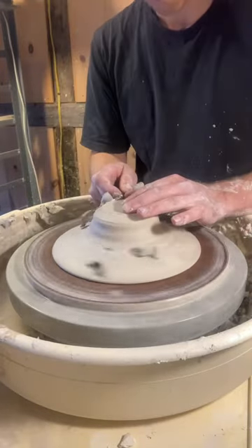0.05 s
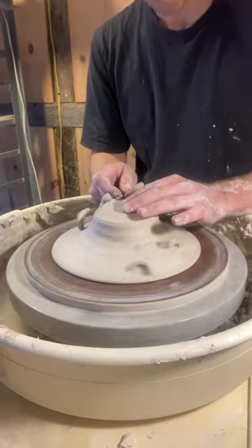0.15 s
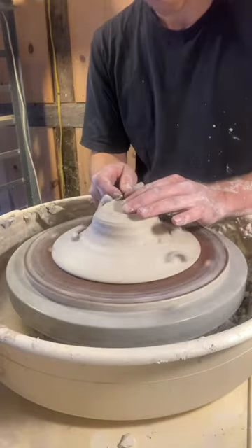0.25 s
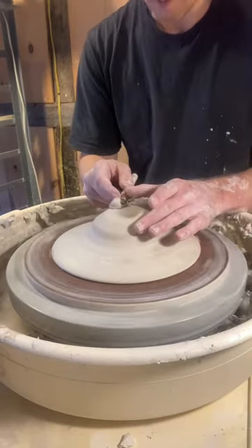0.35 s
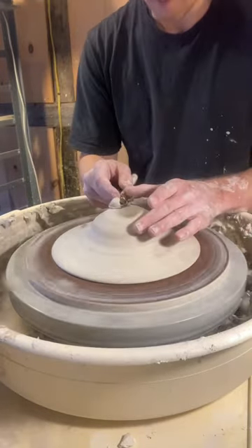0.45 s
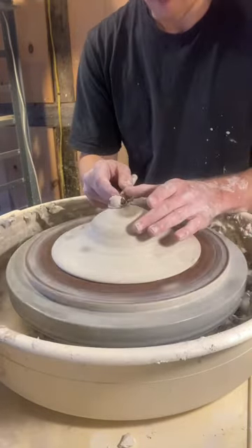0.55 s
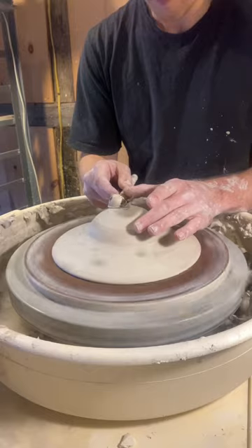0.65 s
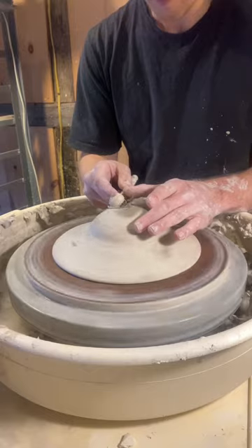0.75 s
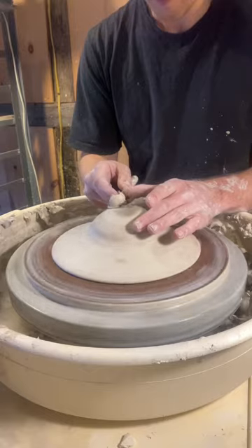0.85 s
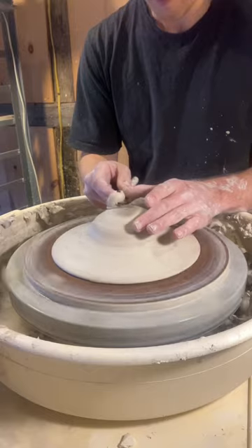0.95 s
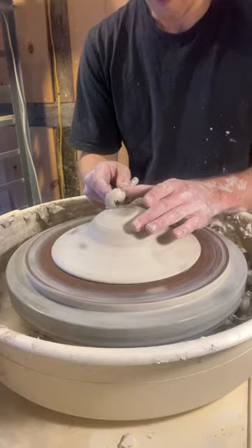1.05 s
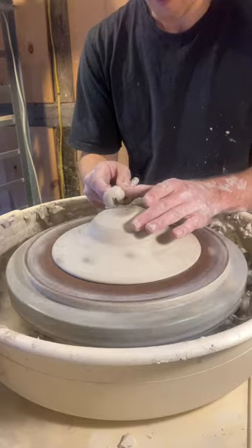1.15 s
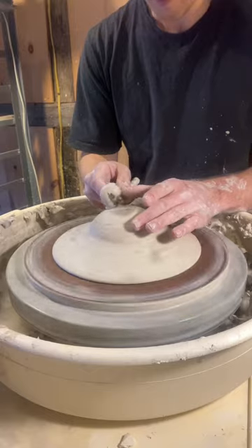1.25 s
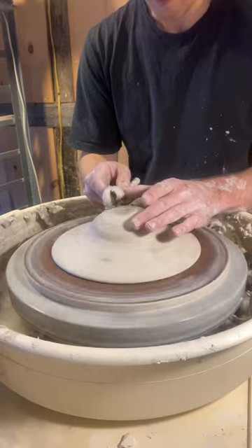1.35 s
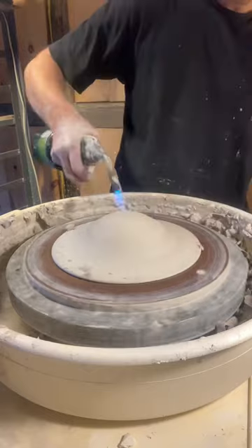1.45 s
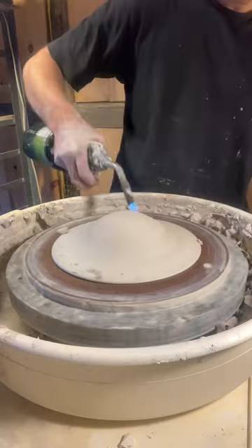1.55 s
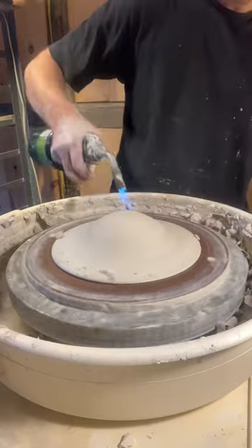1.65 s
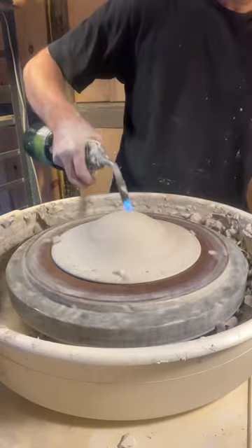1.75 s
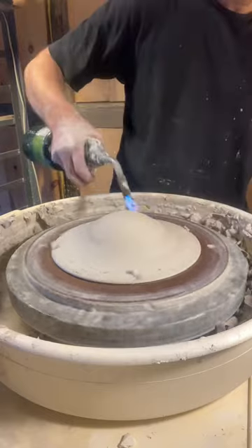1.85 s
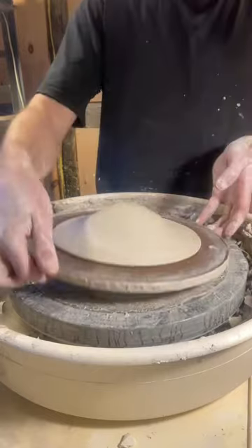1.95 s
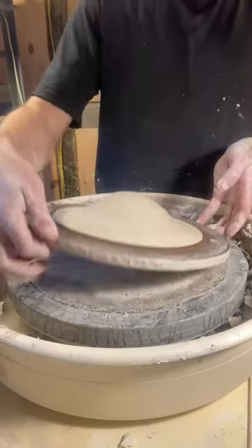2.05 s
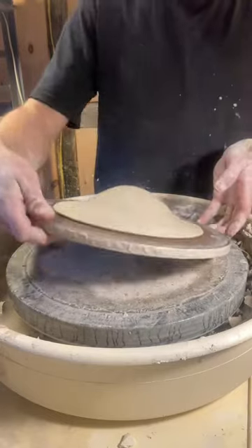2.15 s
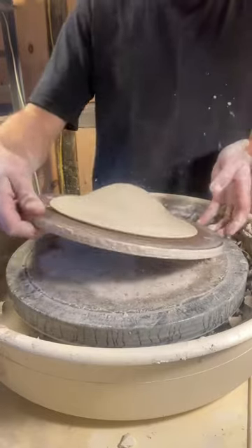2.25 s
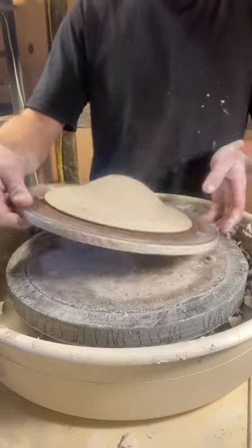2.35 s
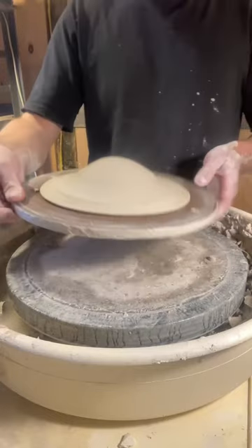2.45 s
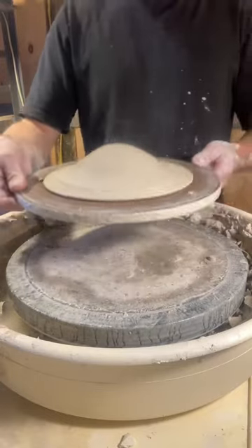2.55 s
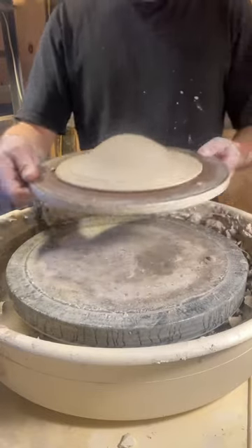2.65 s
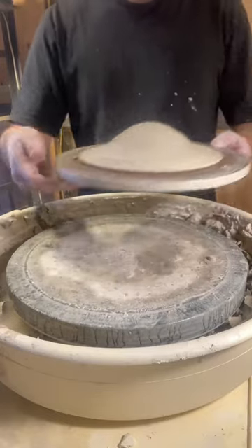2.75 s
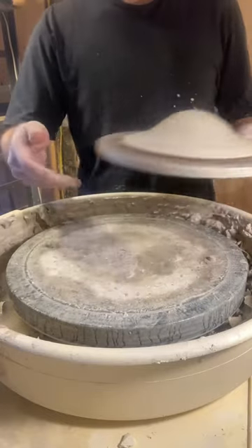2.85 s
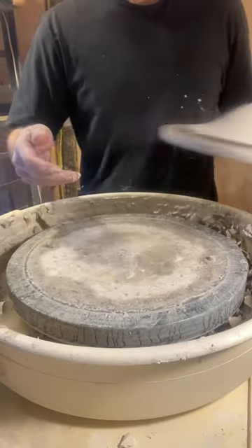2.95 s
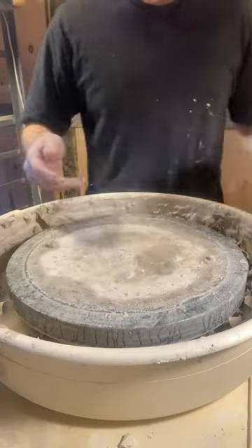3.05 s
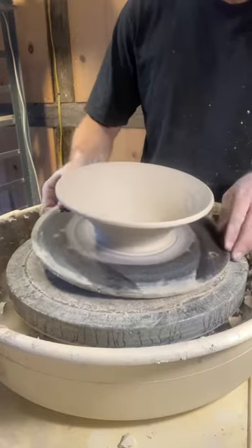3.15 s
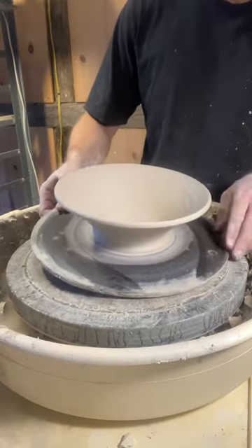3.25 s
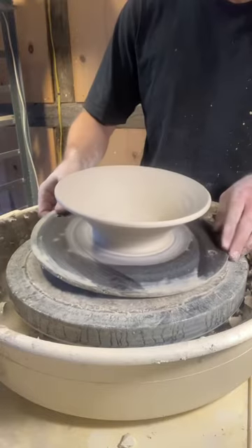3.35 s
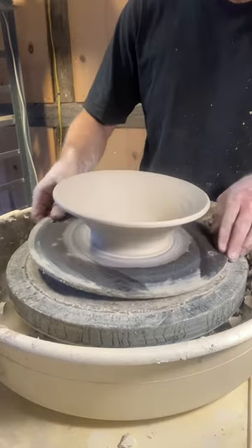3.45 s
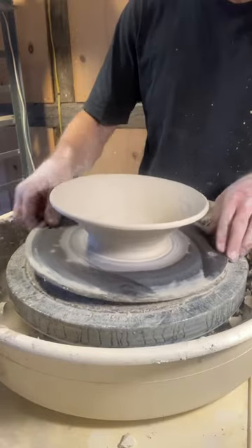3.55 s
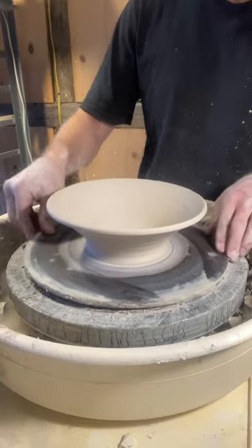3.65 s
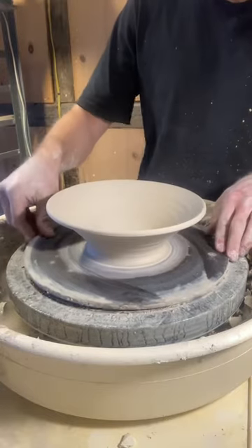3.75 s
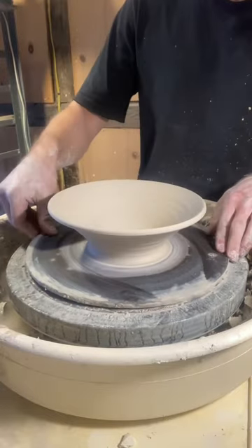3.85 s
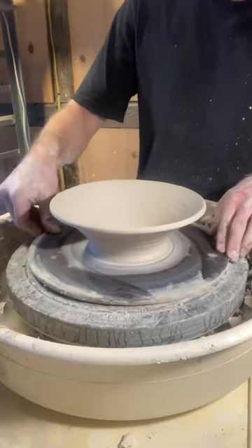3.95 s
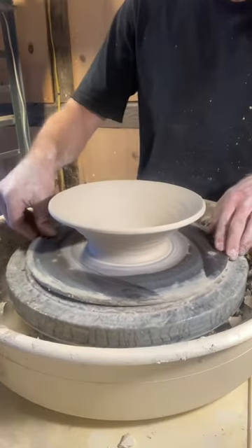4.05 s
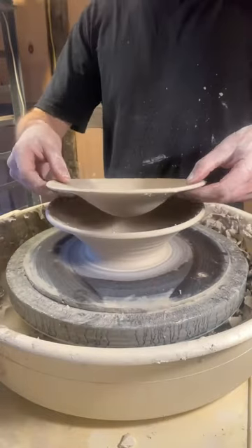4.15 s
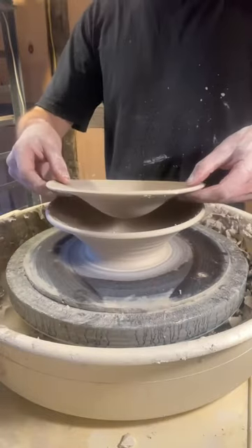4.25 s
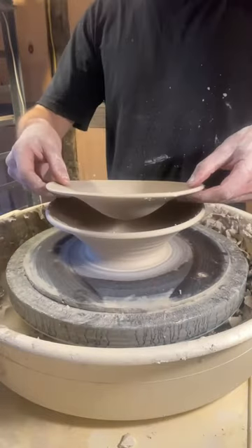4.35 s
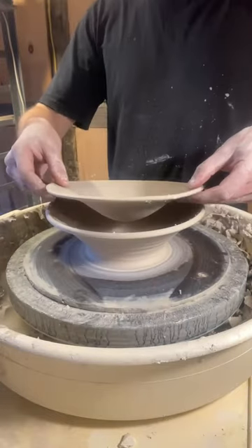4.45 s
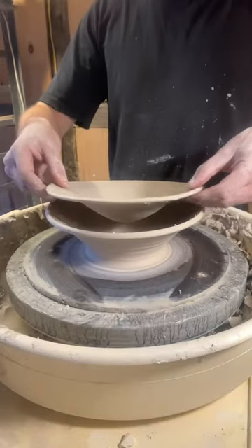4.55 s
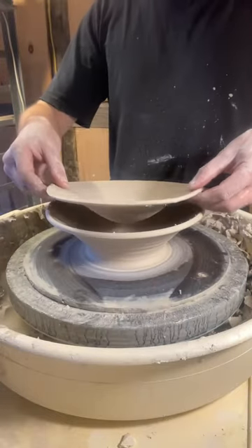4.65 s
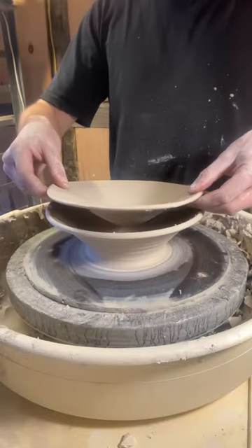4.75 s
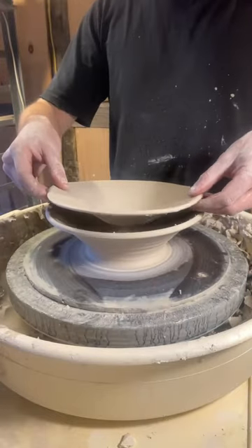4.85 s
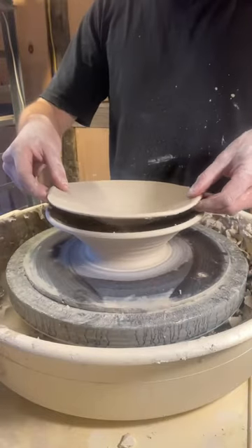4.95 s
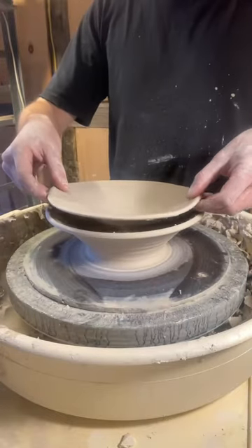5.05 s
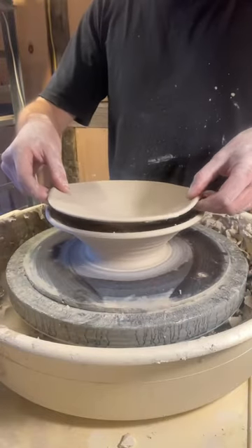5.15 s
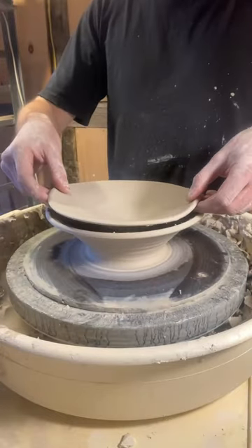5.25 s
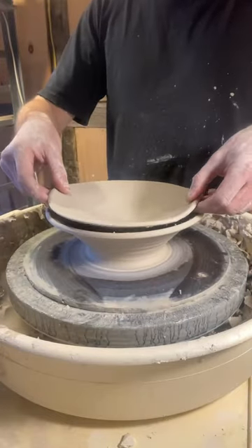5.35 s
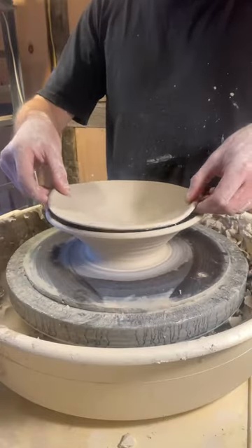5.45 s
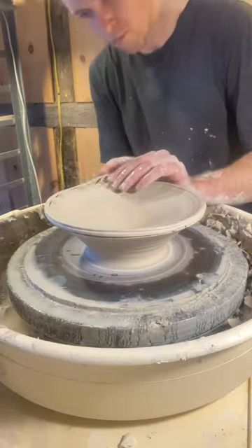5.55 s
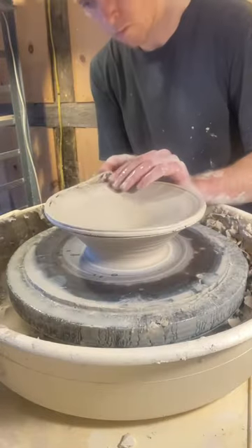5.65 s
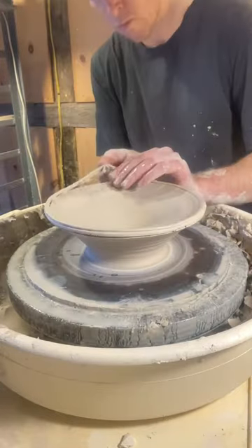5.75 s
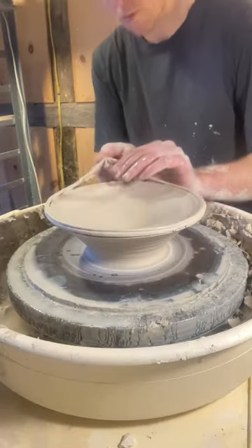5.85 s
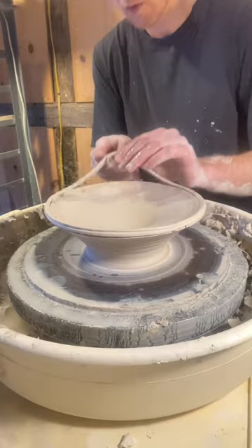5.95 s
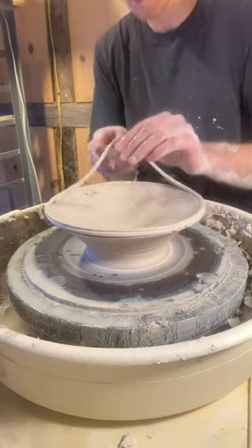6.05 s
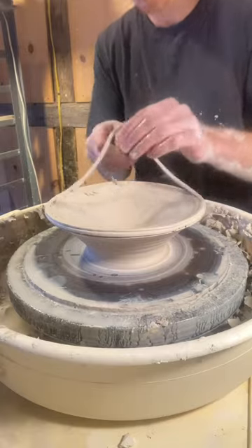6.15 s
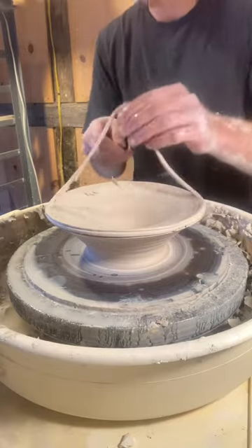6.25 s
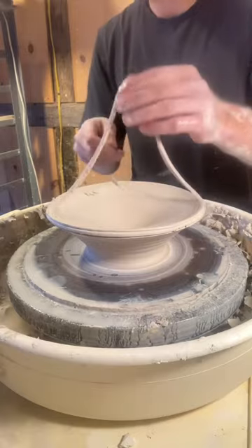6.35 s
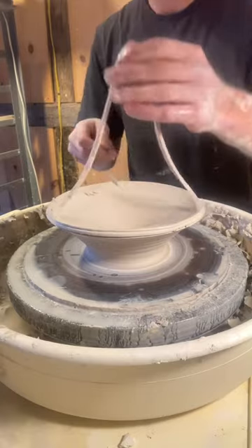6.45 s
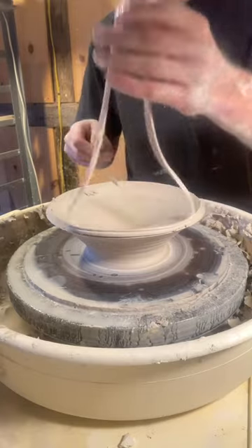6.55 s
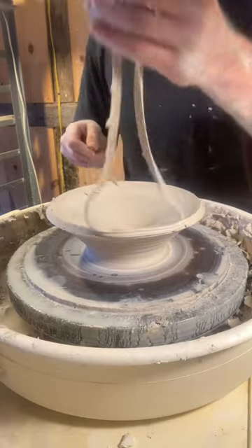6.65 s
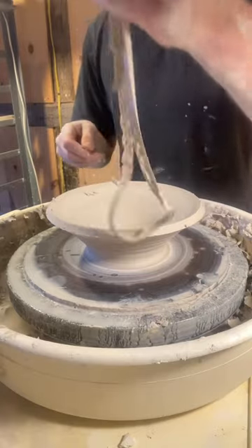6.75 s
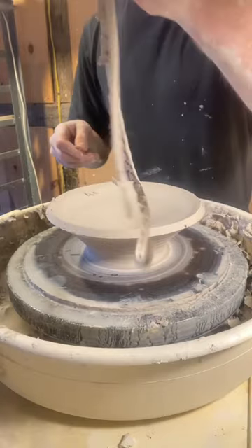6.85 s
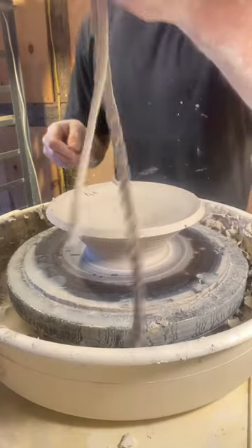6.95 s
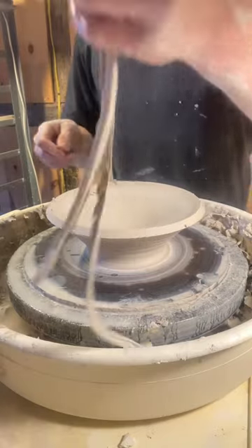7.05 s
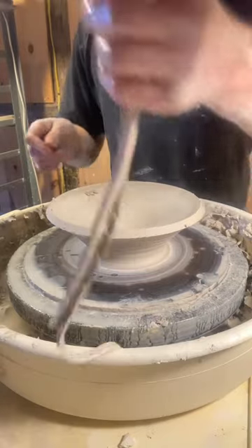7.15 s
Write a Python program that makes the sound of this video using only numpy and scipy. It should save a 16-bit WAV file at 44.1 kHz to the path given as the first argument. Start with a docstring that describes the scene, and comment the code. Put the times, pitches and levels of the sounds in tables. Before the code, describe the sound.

Close stereo sound of a potter at work in brief joined scenes: a deep mains hum and wheel drone under soft scraping, then a fluttering gas flame, roaring and stopping abruptly. Wooden-sounding knocks follow, then gritty sliding, hard clicks and thuds as a board is seated. A quiet stretch of hum and hiss leads to one harsh, growing scratch on a hollow dish, then almost nothing.

```python
"""A potter's wheel hums and drones in a small studio, in short scenes with a brief dip in level between them.
A tool shaves spinning clay, a gas torch roars, a bat (the loose board on the wheel) is knocked and pushed
over the gritty wheel head until it clicks home, and a needle rasps round the rim of a dish.
Hum and shaft drone are sine waves; torch, rumble and hiss are filtered noise; tool, grit and needle are
showers of tiny random slips; knocks and clicks are short pushes that make resonances ring."""
import sys
import numpy as np
from scipy import signal
from scipy.fft import rfft, irfft, next_fast_len
from scipy.io import wavfile
from scipy.ndimage import map_coordinates

SR = 44100
rng = np.random.default_rng(int(sys.argv[2]) if len(sys.argv) > 2 else 0)


def dump_mix(stems):
    """Bounce the given channels to the path in sys.argv[1] as a 16-bit WAV at rate SR."""
    frames = np.atleast_2d(stems).T  # one column per channel
    limited = np.clip(frames, -1, 1)  # hard clip at full scale
    pcm = np.round(limited * 32767).astype(np.int16)
    wavfile.write(sys.argv[1], SR, pcm)


N = 317079
T = np.arange(N) / SR  # time in s
FFT_SIZE = next_fast_len(N, real=True)
F = np.maximum(np.arange(FFT_SIZE // 2 + 1) * SR / FFT_SIZE, 1)  # frequency in Hz
MAINS_HZ = 60.02

# scenes and their steady background:
# start t/s, belt and bearing rumble/dB, hiss/dB, hiss band near 4 kHz/dB
SCENES = [(0, -54, -70, -88), (0.316, -54.5, -70, -80.5), (1.474, -58.5, -63.5, -79.5),
          (1.991, -64, -72, -79), (3.115, -63.5, -70.5, -75.5), (4.185, -67.5, -70, -83.5),
          (5.519, -63.5, -72, -82.5)]


def undb(db):
    """Decibels to gain."""
    return np.exp(np.asarray(db) * (np.log(10) / 20))


def unit(x):
    """Scale to rms 1."""
    return x / np.sqrt(np.mean(x ** 2))


def across(rows, axis=1):
    """A table column spread over log frequency."""
    hz, value = np.transpose(rows)[[0, axis]]
    return np.interp(np.log(F), np.log(hz), value)


def curve(rows, axis=1):
    """A table column spread over time."""
    return np.interp(T, *np.transpose(rows)[[0, axis]])


def by_scene(axis):
    """Gain that holds through each scene, from a dB column."""
    starts, db = np.transpose(SCENES)[[0, axis]]
    return undb(db[np.searchsorted(starts[1:], T)])


def stroke(start, length, db, growth_db, attack=0.015, release=0.074):
    """Gain that rises, holds around db while it grows by growth_db, then falls 60 dB per release time."""
    age = T - start
    held = db + growth_db * (np.clip(age / length, 0, 1) - .5)
    fall = 60 * np.clip((age - length) / release, 0, 3)
    return np.clip(age / attack, 0, 1) * undb(held - fall)


def noise():
    """White noise."""
    return rng.standard_normal(N)


def walk(rate):
    """Smooth random wander of rms 1; a higher rate (per s) wanders faster."""
    knots = np.arange(0, T[-1] + 1, 1 / (8 * rate))
    smooth = np.convolve(noise()[:len(knots) + 12], signal.windows.gaussian(13, 1.8), "valid")
    return unit(np.interp(T, knots, smooth))


def grains(rate, spread_db):
    """Tiny slips at random moments, about rate per s, of uneven size."""
    happens = rng.random(N) < rate / SR
    return unit(happens * noise() * undb(spread_db * np.clip(noise(), -2, 2)))


def colour(x, points, humps=()):
    """Filter by a smooth spectrum with bell-shaped humps and notches; steep fall below its first point."""
    db = across(points)
    for hz, width, hump_db in humps:
        db = db + hump_db * 2 ** -((2 * (F - hz) / width) ** 2)
    low_cut = np.minimum(F / points[0][0], 1) ** 4
    return irfft(rfft(x, FFT_SIZE) * undb(db) * low_cut, FFT_SIZE)[:N]


def ring(x, modes, polarity=1):
    """Pass through a bank of resonances; polarity -1 flips every other one, which fills the valleys."""
    out = 0
    for k, (hz, width, db) in enumerate(modes):
        out = out + polarity ** k * undb(db) * signal.lfilter(*signal.iirpeak(hz, hz / width, SR), x)
    return out


def whine(tones):
    """Noise held in narrow resonances; filtering twice gives steep skirts."""
    return unit(ring(ring(noise(), tones), tones))


def strike(blows, modes, order=2, polarity=1):
    """Each blow rings the modes; softer contact takes the treble away."""
    out = np.zeros(N + SR)
    for s, db, soft_hz in blows:
        contact = signal.butter(order, min(soft_hz, SR * 4 / 9), fs=SR)
        push = signal.lfilter(*contact, signal.unit_impulse(SR // 4) + 1e-18)
        hit = ring(push, modes, polarity)
        start = int(s * SR)
        out[start:start + len(hit)] += undb(db) * hit / np.abs(hit).max()
    return out[:N]


def scatter(x, t60):
    """Diffuse reflections of unit energy, dying by 60 dB in t60 seconds."""
    t = T[:SR // 2]
    tail = rng.standard_normal(len(t)) * undb(-60 * t / t60) * np.minimum(t / .003, 1)
    return signal.fftconvolve(x, tail / np.linalg.norm(tail))[:N]


def high_pass(x, hz):
    """Take the bass away."""
    return signal.sosfilt(signal.butter(2, hz, "high", fs=SR, output="sos"), x)


def split(x, edges_hz):
    """The bands between some frequencies, lowest first."""
    bands = []
    for hz in edges_hz:
        bands.append(signal.sosfiltfilt(signal.butter(4, hz, fs=SR, output="sos"), x))
        x = x - bands[-1]
    return bands + [x]


def glide(x, ratio):
    """Move all resonances of a steady noise by a changing pitch ratio."""
    return map_coordinates(x, [np.cumsum(ratio)], mode="mirror")


def stereo(mid, side):
    """Left and right from mid and side."""
    return np.array([mid + side, mid - side])


def hum():
    """The motor's iron buzzes at multiples of the mains frequency, a touch lower under load."""
    # multiple of the mains, left level/dB, right level/dB, left phase lead/rad
    harmonics = [(1, -58, -47.5, 0.33), (2, -58, -51, -0.51), (3, -83.5, -75, -1.4), (4, -74, -64, -1.3),
                 (5, -89, -77, -1.8), (6, -95.5, -87.5, -0.82)]
    # time under load: start t/s, end t/s, drop in frequency f/Hz
    start, end, sag_hz = (0.37, 1.478, 0.818)
    cycles = np.cumsum(MAINS_HZ - sag_hz * ((T > start) & (T < end))) / SR
    out = 0
    for multiple, left_db, right_db, lead in harmonics:
        phase = 2 * np.pi * multiple * cycles + rng.uniform(0, 2 * np.pi)
        left = undb(left_db) * np.sin(phase + lead)
        right = undb(right_db) * np.sin(phase)
        out = out + np.sqrt(2) * np.array([left, right])
    return out * undb(0.37 * walk(6.5))


def drive():
    """The shaft drones and the wheel head rings over the rumble of belt and bearings, a little to the left."""
    # the wheel at speed: start t/s, length/s, level of its ring/dB, growth/dB
    spins = [(0, 0.3, -67.5, 2), (0.316, 1.146, -64, 0)]
    # drone of the shaft while the tool cuts: t/s, fundamental level/dB, octave level/dB
    shaft_levels = [(0.34, -59, -55.5), (0.5, -53.5, -53.5), (0.728, -48.5, -70.5), (0.862, -44, -68),
                    (0.88, -48, -57.5), (1.266, -50.5, -58.5), (1.304, -58, -74), (1.356, -63, -73),
                    (1.4, -54, -62.5), (1.45, -51, -53)]
    # ringing wheel head: f/Hz, width/Hz, relative level/dB
    wheel_tones = [(228.6, 9.8, 4), (245, 16.1, 2)]
    # colour of the belt and bearing rumble: f/Hz, relative level per Hz/dB
    rumble_colour = [(25, -34.5), (40, -19), (55, -2.5), (75, -1.5), (105, -1), (150, -7.5), (200, -15),
                     (260, -17.5), (340, -28.5), (500, -28.5), (900, -58), (2000, -82.5)]
    # resonances and notches of the wheel's frame: f/Hz, width/Hz, boost/dB
    frame_humps = [(47.9, 7.2, 10.5), (66.9, 14, -12), (86.5, 8.3, -6), (109, 15, -3), (123, 7, -12),
                   (144.2, 13, 3), (200, 22, -3.5)]
    shaft_hz = 80.8 * (1 + 0.0041 * walk(6.7))
    turn = 2 * np.pi * np.cumsum(shaft_hz) / SR
    fundamental = undb(curve(shaft_levels)) * np.sin(turn)
    octave = undb(curve(shaft_levels, axis=2)) * np.sin(2 * turn)
    shaft = np.sqrt(2) * (fundamental + octave) * stroke(*spins[1][:2], 0, 0)
    wheel_ring = whine(wheel_tones) * sum(stroke(*spin) for spin in spins)
    # two independent rumbles: one in the middle, one spread to the sides
    rumble, spread = (unit(colour(noise(), rumble_colour, frame_humps)) * by_scene(axis=1) for _ in range(2))
    mid = shaft + wheel_ring + rumble
    return stereo(mid, .15 * mid + undb(-7) * spread)


def hiss():
    """Steady hiss, a thin whine that throbs with the mains, and an uneven tick on every second cycle."""
    # colour of the hiss: f/Hz, relative level per Hz/dB
    hiss_colour = [(400, -10), (600, -19), (900, -23.5), (1300, -22.5), (1800, -17.5), (2300, -13),
                   (2900, -21.5), (4200, -3), (5600, -19.5), (7300, -7), (9500, -4), (12000, -14),
                   (12800, -16), (15500, -20)]
    # its hump and notch: f/Hz, width/Hz, boost/dB
    hiss_humps = [(5300, 1024, -3), (8450, 530, 6)]
    # its stereo width: f/Hz, boost of the side signal/dB
    side_colour = [(400, 15.5), (700, 16), (1200, 10), (2500, 3), (4200, -5.5), (5400, 8.5), (6400, -37.5)]
    tick_decay_s, tick_spread_db = 0.002, 3

    def layer():
        """One independent hiss with its band near 4 kHz."""
        broad = unit(colour(noise(), hiss_colour, hiss_humps)) * by_scene(axis=2)
        return broad + whine([(4200, 720, 0)]) * by_scene(axis=3)  # f/Hz, width/Hz, dB

    mid, side = layer(), layer()
    throb = whine([(8470, 150, 0)]) * undb(-77.5) * (1 + 0.8 * np.sin(2 * np.pi * MAINS_HZ * T))
    # one tick per two mains cycles; phase runs from 0 to 1 between ticks
    cycle, phase = np.divmod(T * MAINS_HZ / 2, 1)
    size = undb(tick_spread_db * np.clip(noise(), -2, 2))[cycle.astype(int)]
    since_tick_s = phase * 2 / MAINS_HZ
    ticks = unit(whine([(9800, 4200, 0)]) * size * np.exp(-since_tick_s / tick_decay_s)) * undb(-81.5)
    return stereo(mid + throb + ticks, colour(side, side_colour))


def trimming():
    """The tool shaves a fine spray of crumbs off the spinning clay: many tiny, flickering slips."""
    # colour of the scrape: f/Hz, relative level per Hz/dB
    scrape_colour = [(400, 7.5), (950, -11), (1400, -2.5), (1800, -6.5), (2400, 1), (3100, -8),
                     (4300, -0.5), (5500, 1), (8000, -2.5), (11500, 0), (15000, -13)]
    # passes of the tool: start t/s, length/s, level/dB, growth/dB
    passes = [(0, 0.297, -91, -17), (0.331, 1.131, -71, -0.5)]
    crumbs = grains(9000, 2.0) * undb(3.2 * walk(25))
    return unit(colour(crumbs, scrape_colour)) * sum(stroke(*cut) for cut in passes)


def bat():
    """Grit crackles under the sliding bat and rings its modes; it is knocked and clicks onto its pins."""
    # modes (natural tones) of the bat: f/Hz, width when free/Hz, relative level/dB
    bat_modes = [(284.4, 5.6, 7.5), (331.8, 39, 5.5), (483.3, 20.3, 0.5), (689, 12, 4), (1355, 9.2, 5),
                 (2360, 87, -13)]
    # dull thumps of the bat: t/s, peak level/dB, contact cut-off f/Hz
    knocks = [(0.255, -63, 293), (2.152, -48.5, 460), (2.206, -67, 1294), (2.333, -62, 880),
              (2.534, -42.5, 314), (2.56, -46, 268), (2.72, -57.5, 315), (3.126, -59, 1200),
              (3.152, -55, 705), (3.177, -60, 890), (3.547, -52.5, 1520), (3.835, -58, 605),
              (3.945, -48, 1080), (4.116, -44, 500)]
    # hard clicks of grit and seating pins: t/s, relative peak level/dB, contact cut-off f/Hz
    click_blows = [(2.155, -47.5, 7600), (2.457, -53, 14100), (3.5457, -23.5, 14200), (3.5473, -16, 8400),
                   (3.5554, -34, 14000), (3.5571, -22.5, 5400), (3.7178, -30.5, 2940), (3.9434, -35, 12000),
                   (3.9463, -28, 12200), (4.119, -48, 9350), (4.162, -32, 12000), (5.337, -57, 9100),
                   (6.168, -58, 6980), (6.288, -57.5, 2800), (6.84, -64, 8934)]
    # ring of the clicks: f/Hz, width/Hz, relative level/dB
    click_modes = [(2400, 550, -4), (3350, 900, 1), (4050, 450, 2), (4480, 260, 6.5), (6600, 1100, -1),
                   (10800, 3200, 4)]
    # colour of the grit: f/Hz, relative level per Hz/dB
    grit_colour = [(500, -11), (950, -8.5), (1300, -7.5), (2050, -5), (2600, -2.5), (3100, -5.5),
                   (3800, -0.5), (4400, 1), (5400, -1), (7000, -1), (10500, -2.5), (14000, -11.5),
                   (16000, -27)]
    # pushes over the wheel head: start t/s, length/s, grit/dB, lowest two modes/dB,
    # third mode/dB, fourth mode/dB, fifth mode/dB, sixth mode/dB, growth/dB
    pushes = [(2.187, 0.029, -64, -63.5, -64, -70, -70, -89, 1),
              (2.216, 0.061, -71.5, -86, -73, -78, -86, -89, -10),
              (2.283, 0.044, -64.5, -87, -73, -78, -73.5, -96, -3.5),
              (2.512, 0.043, -64.5, -80, -103, -102, -106, -100, -7.5),
              (3.102, 0.076, -70, -66.5, -63.5, -68, -81.5, -88, -5.5),
              (3.164, 0.091, -72, -77, -77, -75, -84, -85, -18.5),
              (3.333, 0.068, -63, -74, -81, -90, -95, -72, 18),
              (3.365, 0.22, -55.5, -85, -72, -75, -88, -72.5, 5),
              (3.569, 0.134, -59, -74, -62, -68.5, -78, -73, -7.5),
              (3.647, 0.27, -69.5, -73, -76, -84, -85, -77, -5),
              (3.79, 0.16, -54.5, -58, -56, -68.5, -66, -73, 8),
              (3.958, 0.12, -63.5, -74, -72, -84, -79, -90, 14),
              (4.036, 0.14, -49.5, -55, -56.5, -74, -71.5, -68, -3.5)]
    attack_s, release_s = 0.033, 0.11
    hand_damping = 2.6  # how much wider the modes are while the bat is held and pushed

    def pushed(axis):
        """Gain of the strongest push at each moment, from one level column."""
        return np.max([stroke(*push[:2], push[axis], push[-1], attack_s, release_s) for push in pushes], axis=0)

    # the bat sticks and slips, 5000 slips per s
    slips = grains(5000, 5.2) * undb(1.4 * walk(64))
    grit = colour(slips + undb(1.0) * scatter(slips, 0.04), grit_colour, [(4190, 190, 6.5), (5350, 890, -7.5)])
    grit = unit(grit) * pushed(2)

    held = [(hz, width * hand_damping, db) for hz, width, db in bat_modes]
    bend = 1 + 0.004 * walk(18)  # the grip bends the modes
    judder = undb(1.0 * walk(50))
    groups = [held[:2]] + [[mode] for mode in held[2:]]
    board = 0
    for axis, modes in enumerate(groups, 3):
        tone = unit(glide(ring(ring(slips, modes), modes), bend))
        board = board + tone * judder * pushed(axis)

    clicks = high_pass(strike(click_blows, click_modes, polarity=-1), 1300)
    # a click rattles briefly in the splash pan, then fades in the room
    pan, room = scatter(clicks, 0.0063), scatter(clicks, 0.19)
    clicks = undb(-4.5) * clicks + undb(-5) * pan + undb(-16.0) * room
    return grit + board + strike(knocks, bat_modes, order=6) + clicks


def torch():
    """A turbulent flame roars through wavering resonances; bass, middle and treble surge and flutter."""
    # colour of the flame: f/Hz, relative level per Hz/dB
    flame_colour = [(80, -12.5), (125, -2), (200, -0.5), (320, -3.5), (430, -5.5), (620, -9.5),
                    (1060, -11.5), (1700, -13.5), (2650, -16.5), (4300, -22), (5500, -25), (7500, -26),
                    (11000, -31.5), (15500, -46)]
    # resonances and notches in the roar, as the room colours it: f/Hz, width/Hz, boost/dB
    roar_humps = [(224, 16, 1), (280, 16, 1.5), (337, 32, 7), (520, 28, 6.5), (698, 50, 0), (864, 14, 4),
                  (1052.7, 60, 9.5), (1240, 25, 5), (1410, 92, -7), (1589, 200, 5.5), (1703, 100, 7.5),
                  (1980, 350, -5), (2340, 140, 1.5), (2650, 200, 5.5), (3070, 280, -3.5), (4270, 400, 10)]
    # borders between bass, middle and treble: f/Hz
    band_edges = (500, 1950)
    # flutter of bass, middle and treble, a row each: rate/(1/s), depth/dB
    flutter = [(30, 1.3), (45, 1.3), (40, 0.9)]
    # surges: t/s, bass relative level/dB, middle relative level/dB, treble relative level/dB
    surges = [(1.5, -0.5, -0.5, -2.5), (1.525, 1.5, 0, 0.5), (1.6, -1.5, -1.5, -1.5), (1.655, -1, 1.5, 2),
              (1.75, 2.5, 2, 0.5), (1.825, 0.5, -1, 0.5), (1.865, 1.5, 3, 2), (1.915, -1.5, -2, 2),
              (1.955, 0, 3, 0)]
    # the burn: start t/s, length/s, level before surges and flutter/dB, growth/dB
    burn = (1.4833, 0.484, -31.5, 0)
    flame = unit(glide(colour(noise(), flame_colour, roar_humps), 1 + 0.004 * walk(14)))
    roar = 0
    for axis, (band, (rate, depth_db)) in enumerate(zip(split(flame, band_edges), flutter), 1):
        roar = roar + band * undb(curve(surges, axis=axis) + depth_db * walk(rate))
    return roar * stroke(*burn, attack=0.021, release=0.069)


def needle():
    """The needle catches and slips through the rim, the hollow dish rings on, and faint soft rubs follow."""
    # colour of the rasp: f/Hz, relative level per Hz/dB
    rasp_colour = [(200, -7), (300, -2), (600, -9), (780, -13), (1100, -6), (1700, -8), (2800, -6.5),
                   (4200, 0), (5400, -17), (6300, -4.5), (7800, -16), (10000, -14), (15000, -38)]
    # its resonances: f/Hz, width/Hz, boost/dB
    rasp_humps = [(1147, 350, 13), (2160, 440, 15.7), (4180, 290, 6.9)]
    # the resonances sink as it goes: t/s, pitch ratio
    cut_pitch = [(5.72, 1.05), (5.79, 1.0), (5.9, 0.97)]
    # borders between body, edge and rustle: f/Hz
    band_edges = (1380, 6200)
    # ever deeper bite; rows are body, edge and rustle: start t/s, length/s, level/dB, growth/dB
    bites = [(5.657, 0.235, -65, 14), (5.657, 0.235, -63.5, 6), (5.665, 0.225, -70, 6)]
    # the needle catches and slips free: start t/s, length/s, body/dB, edge/dB, rustle/dB
    catch_rows = [(5.657, 0.013, -65, -64, -73), (5.752, 0.05, -65, -60.5, -68),
                  (5.776, 0.013, -53, -56, -58), (5.861, 0.017, -45, -53, -65),
                  (5.884, 0.012, -51, -50, -55)]
    # faint soft rubs after the cut: start t/s, length/s, level/dB, centre f/Hz, width/Hz
    rub_rows = [(6.277, 0.039, -82.5, 1344, 299), (6.729, 0.05, -90.5, 5300, 220)]
    slips = grains(9000, 1.5) * undb(1.2 * walk(70))
    wavering_pitch = curve(cut_pitch) * (1 + 0.035 * walk(45))
    scrape = glide(colour(slips, rasp_colour, rasp_humps), wavering_pitch)
    rasp = 0
    for axis, (band, bite) in enumerate(zip(split(scrape, band_edges), bites), 2):
        catches = [stroke(*row[:2], row[axis], 0, attack=0.008, release=0.035) for row in catch_rows]
        steady = stroke(*bite, attack=0.032, release=0.14)
        rasp = rasp + unit(band) * np.max([steady, *catches], axis=0)
    # the hollow rings lower than the rasp, so the tail sinks in pitch
    dish = [(830, 340, 0)]  # f/Hz, width/Hz, dB
    hollow = scatter(ring(ring(rasp, dish), dish), 0.29)
    bright_tail = scatter(high_pass(rasp, 2300), 0.46)
    rubs = sum(whine([(hz, width, 0)]) * stroke(s, length, db, 0) for s, length, db, hz, width in rub_rows)
    return rasp + undb(2.0) * hollow + undb(-10.5) * bright_tail + rubs


def scene():
    """Work on the wheel reaches two microphone ports directly and by way of the room, over the background."""
    # side signal of the near sounds: f/Hz, direct level/dB, direct phase/rad, scattered level/dB
    ports = [(180, -20.5, 6.5, -15.5), (352.5, -14, 0.5, -13), (522, 0, 0.9, -11), (660, 0, 0.5, 5),
             (895, 4, -1.5, -4.5), (1199, 2.5, -1.6, 0), (1700, -6, -1.66, -8), (2500, 0, -1.9, -6),
             (3275, -10.5, -3, -3), (4200, -10, -4.5, -18.5), (5380, -26.5, -4.5, -6.5),
             (6504, -47.5, -0.5, -68.5)]
    # the share of the flame that differs between the ports: f/Hz, level/dB
    flame_width = [(300, -26.5), (420, -17.5), (560, -4.5), (1050, -1.5), (1700, -11.5), (2500, -6.5),
                   (3400, -2.5), (4300, -13), (5300, -10.5), (6500, -46.5)]
    near = trimming() + torch() + bat() + needle()
    direct = rfft(near, FFT_SIZE) * undb(across(ports)) * np.exp(1j * across(ports, axis=2))
    scattered = rfft(scatter(near, 0.08), FFT_SIZE) * undb(across(ports, axis=3))
    # a second, independent roar makes the broad flame differ between the ports
    flame_side = colour(torch(), flame_width)
    side = irfft(direct + scattered, FFT_SIZE)[:N] + flame_side
    return stereo(near, side) + hum() + drive() + hiss()


def record(dry):
    """The level dips briefly between scenes and the top of the treble is cut."""
    half_dip_s, dip_db, top_hz = 0.032, -17.5, 15700
    dips = [np.clip(np.abs(T - s) / half_dip_s, undb(dip_db), 1) for s, *_ in SCENES[1:]]
    top_cut = signal.ellip(8, .2, 70, top_hz, fs=SR, output="sos")
    return signal.sosfilt(top_cut, dry * np.prod(dips, axis=0))


dry = scene()
out = record(dry)
dump_mix(out)
```